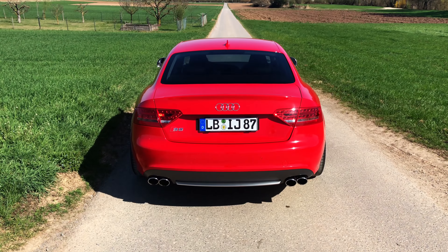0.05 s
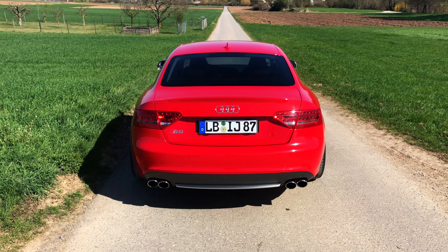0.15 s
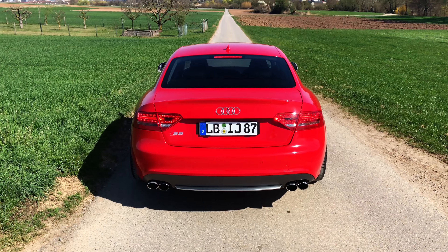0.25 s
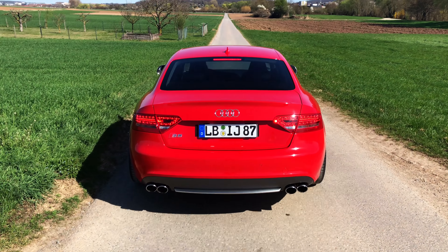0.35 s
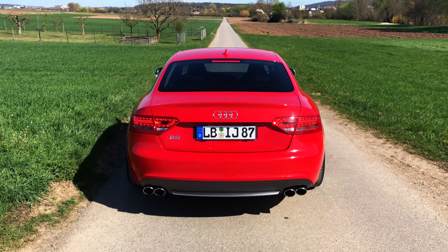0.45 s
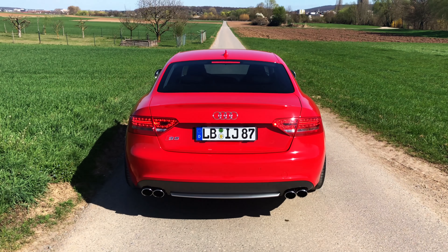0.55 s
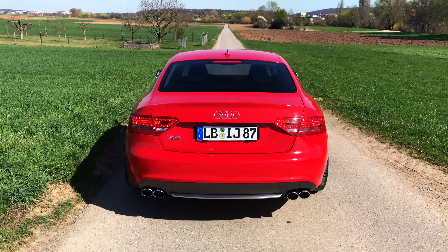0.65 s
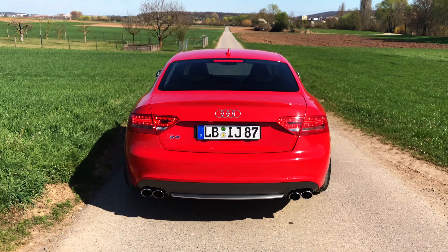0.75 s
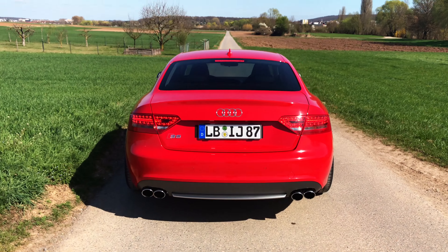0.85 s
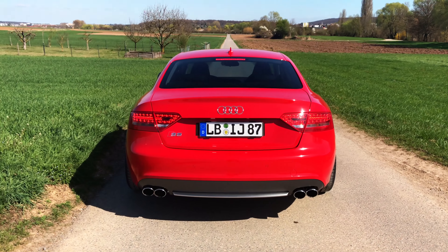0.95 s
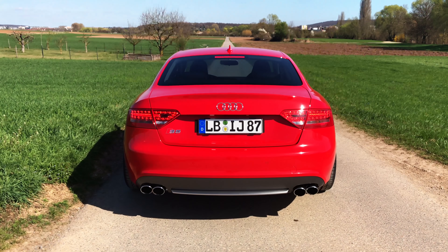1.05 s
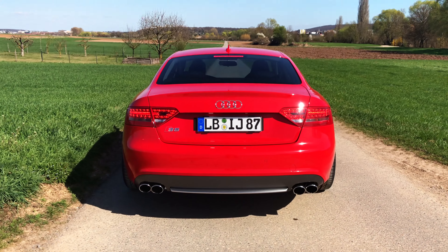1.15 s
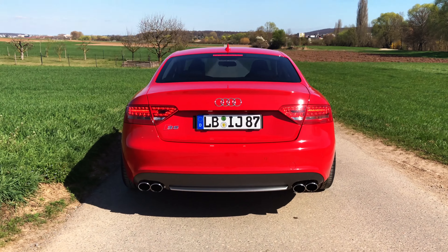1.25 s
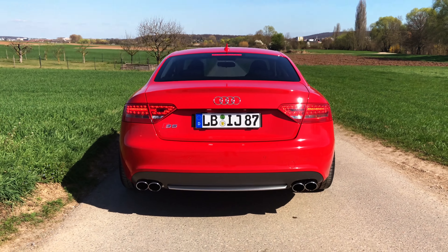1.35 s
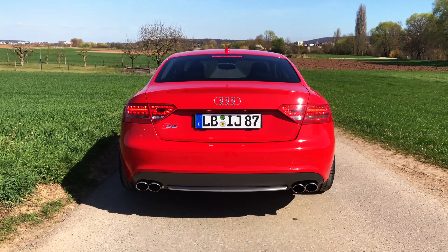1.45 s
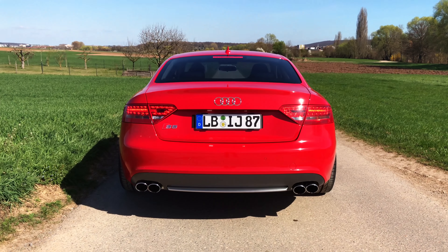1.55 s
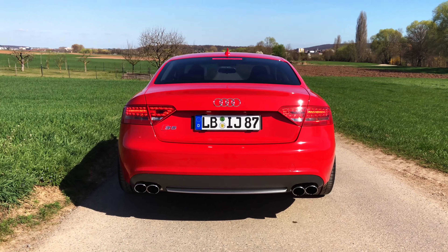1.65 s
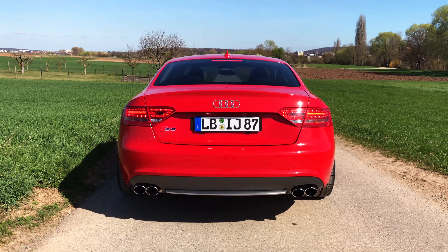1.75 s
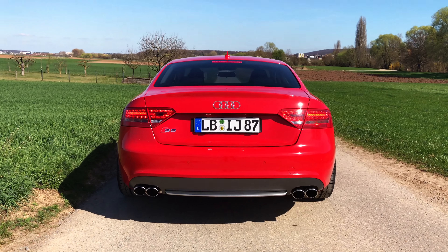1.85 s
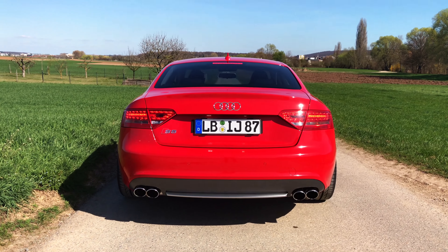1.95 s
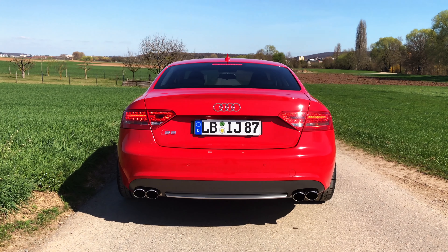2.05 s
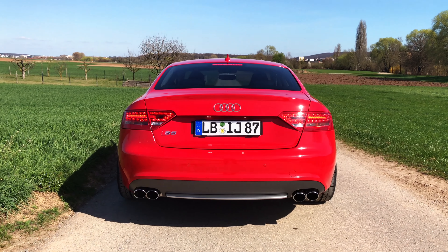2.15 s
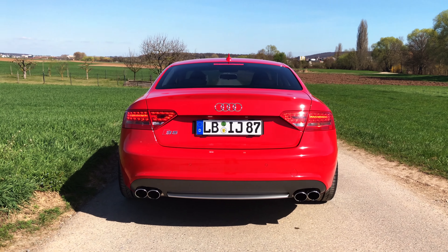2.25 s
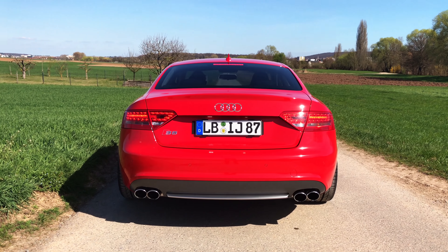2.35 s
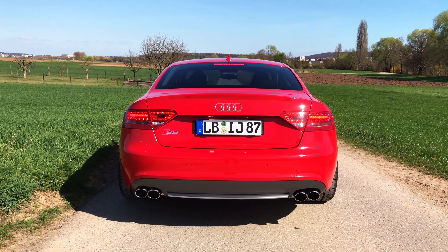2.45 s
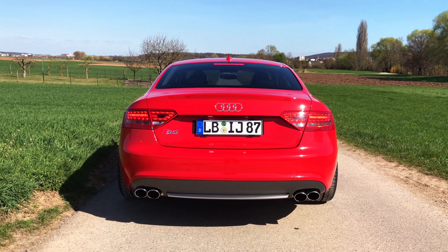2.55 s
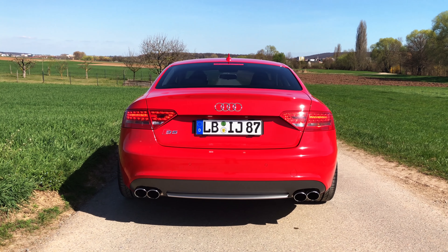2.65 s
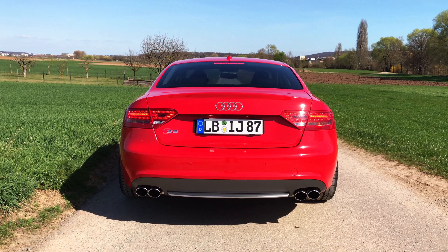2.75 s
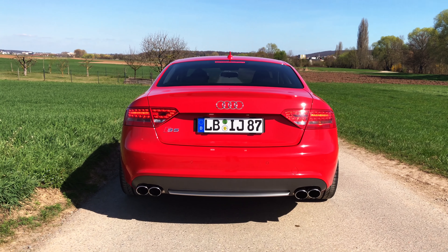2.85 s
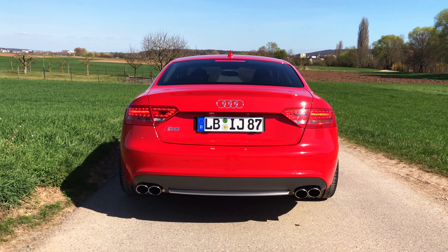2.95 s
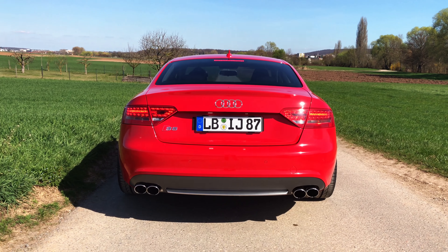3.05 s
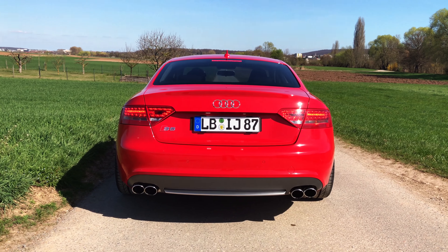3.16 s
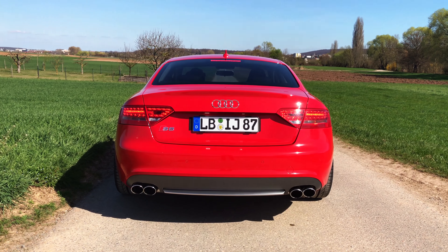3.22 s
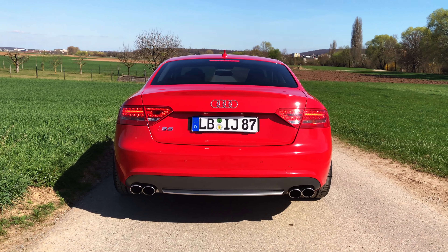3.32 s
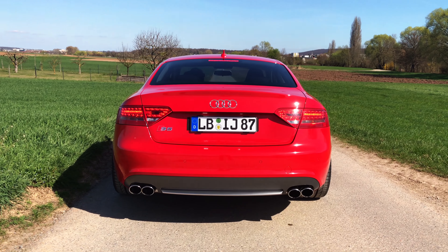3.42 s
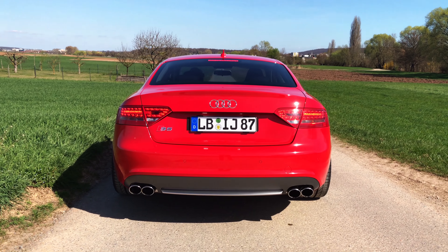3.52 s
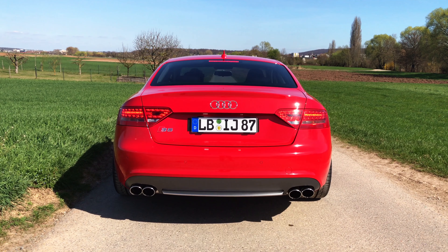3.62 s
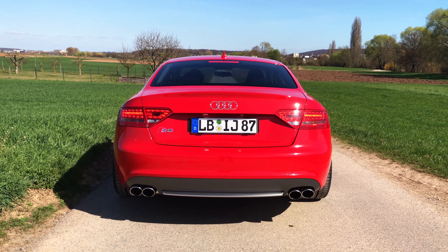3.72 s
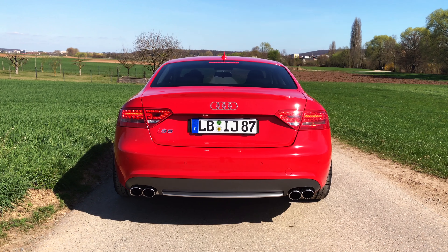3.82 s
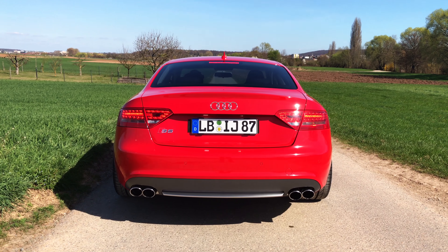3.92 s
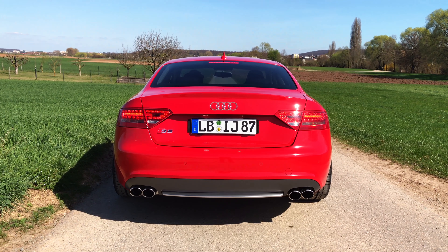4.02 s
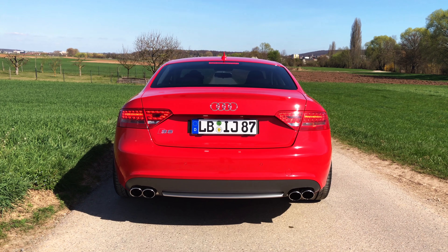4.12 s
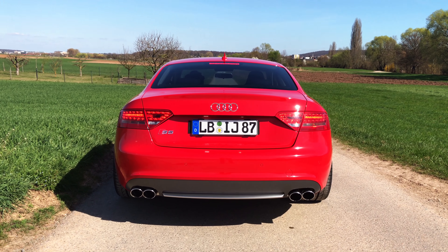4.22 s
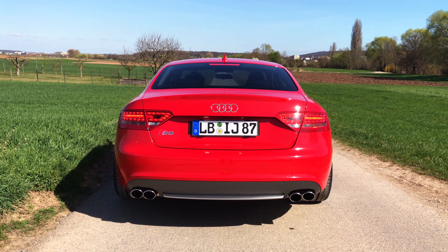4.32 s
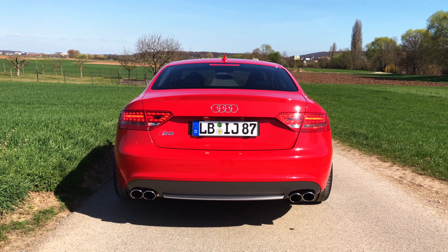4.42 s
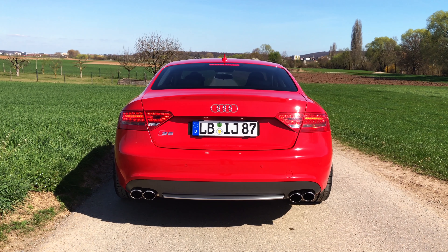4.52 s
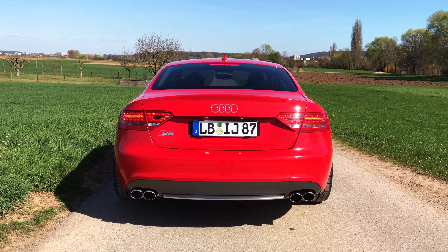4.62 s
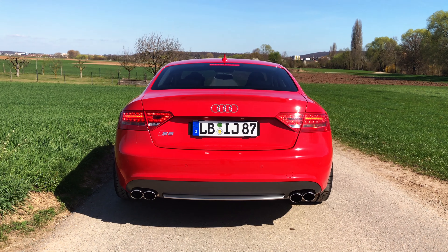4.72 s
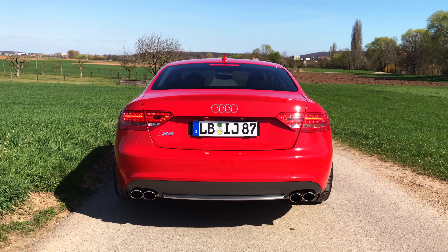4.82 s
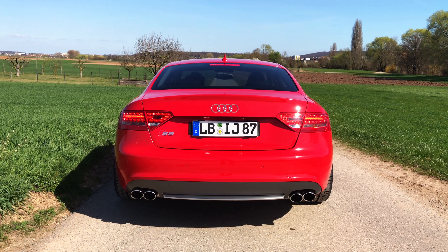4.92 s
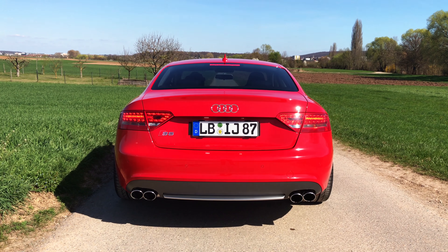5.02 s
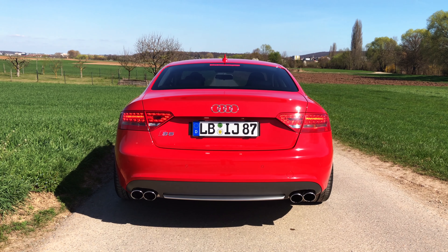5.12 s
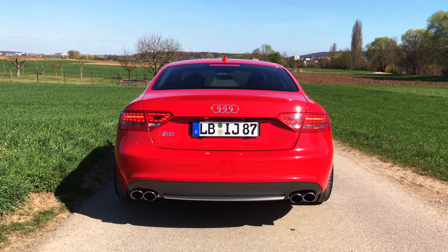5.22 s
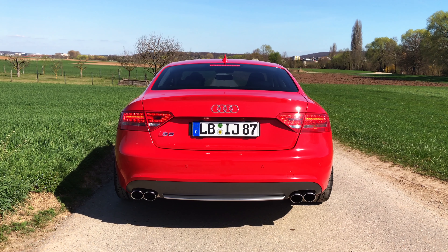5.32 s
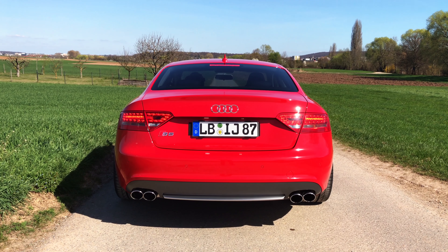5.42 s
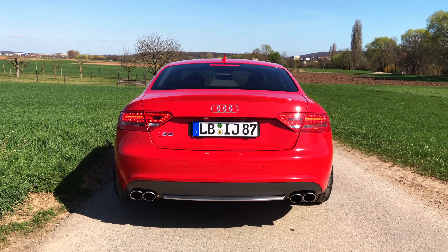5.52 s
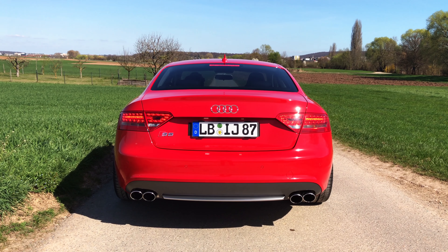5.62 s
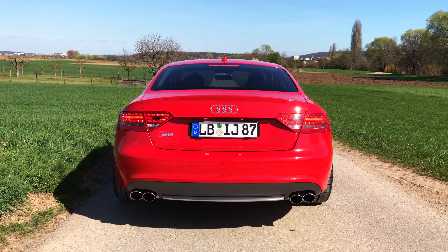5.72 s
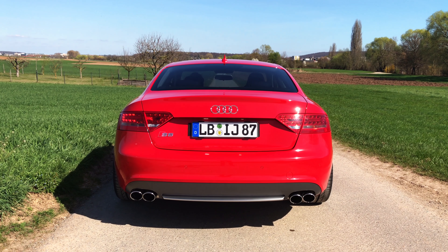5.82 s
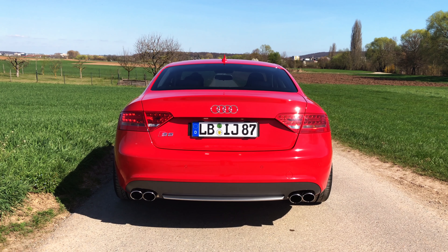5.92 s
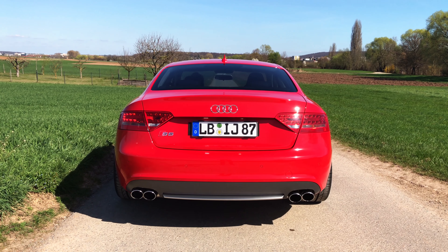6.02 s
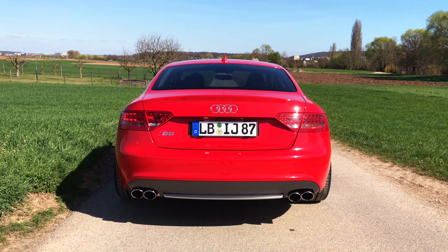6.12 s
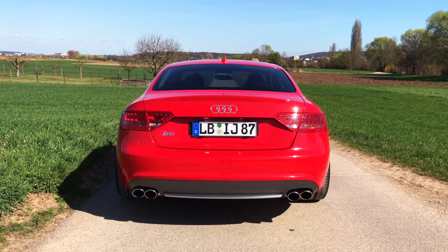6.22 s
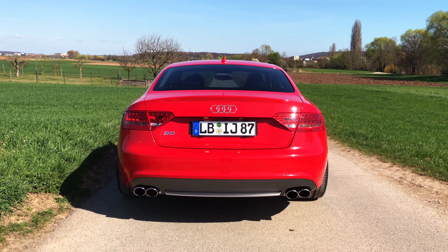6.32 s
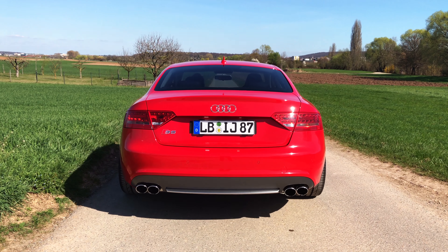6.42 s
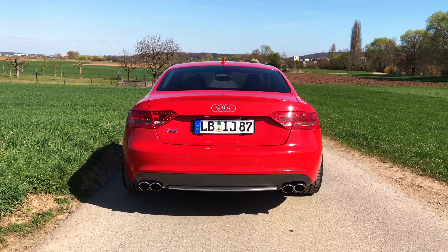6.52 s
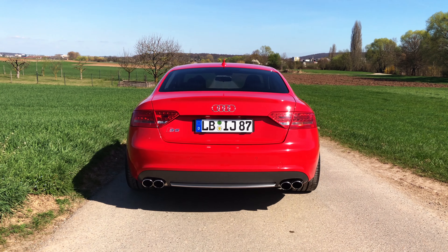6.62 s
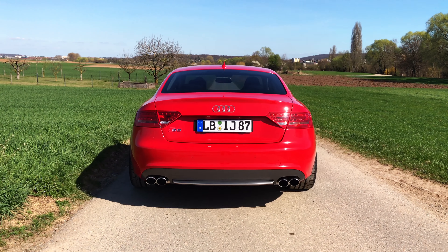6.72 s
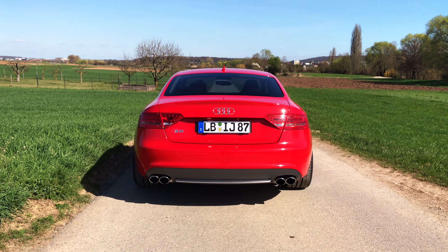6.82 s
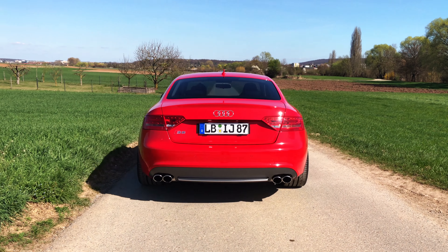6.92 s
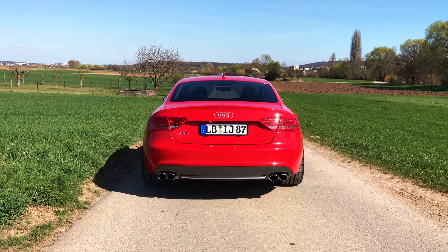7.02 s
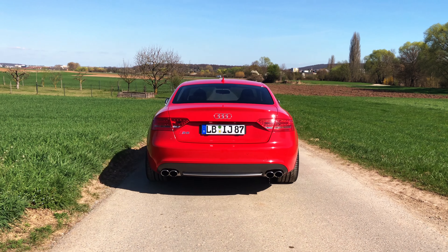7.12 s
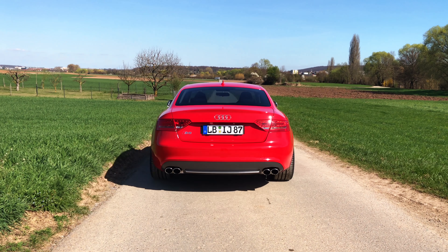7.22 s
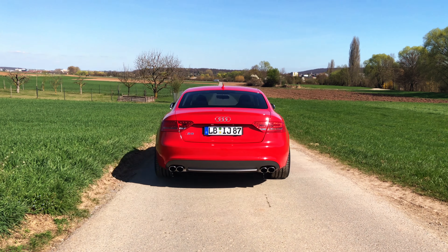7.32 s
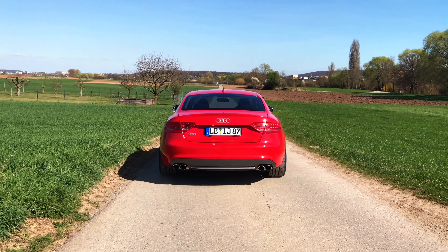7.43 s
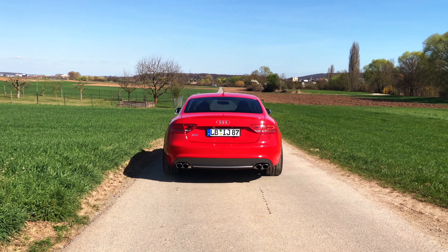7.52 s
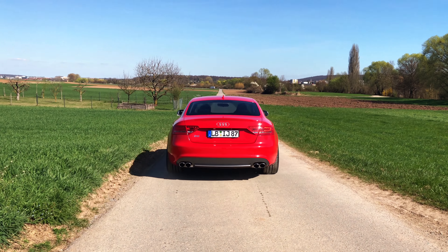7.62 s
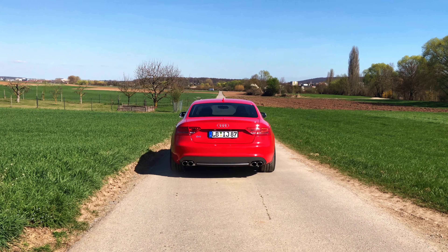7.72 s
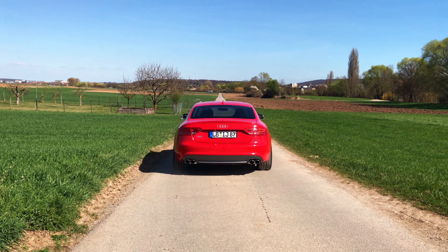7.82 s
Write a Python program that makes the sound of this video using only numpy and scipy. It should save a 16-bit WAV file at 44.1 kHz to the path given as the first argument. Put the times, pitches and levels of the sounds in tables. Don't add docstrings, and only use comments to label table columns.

```python
import sys
import numpy as np
from scipy import signal
from scipy.fft import rfft, irfft
from scipy.io import wavfile
from scipy.ndimage import uniform_filter1d

SR = 44100
rng = np.random.default_rng(int(sys.argv[2]) if len(sys.argv) > 2 else 0)


def how_loud(loudness_db):
    steps = np.asarray(loudness_db, float) / 20
    return 10 ** steps


def log_audio(samples):
    frames = np.atleast_2d(samples).T
    limited = np.clip(frames, -1, 1)
    pcm = np.round(limited * 32767).astype(np.int16)
    wavfile.write(sys.argv[1], SR, pcm)


N = 347067
TIME = np.arange(N) / SR
CATCH_S = 1.298
STUMBLE_S = 6.245

# t/s, firing rate/Hz, firing tone/dB
ENGINE_RUN = [(1.22, 52.06, -34), (1.29, 55.9, -5.5), (1.335, 56.3, -4), (1.46, 90.14, -12),
              (1.6, 108.4, -15.5), (1.9, 106.7, -19), (2.75, 83.5, -18.5), (3.5, 74.3, -18),
              (6.27, 58.4, -19), (6.47, 63.23, -7), (6.7, 85.9, -11), (6.9, 80.2, -14), (7.09, 62.9, -11.5),
              (7.2, 75.4, -6.5), (7.3, 85.3, -12), (7.42, 86.4, -12), (7.62, 106, -20),
              (7.87, 125.3, -17.5)]
# f/Hz, level/dB
SILENCER_RESPONSE = [(15, -46.5), (35, -20.5), (45, -23.5), (55, -2.5), (66, -1.5), (82, -6), (109, -14.5),
                     (135, -14.5), (172, -11.5), (215, -23.5), (260, -33), (310, -32), (400, -48.5),
                     (2000, -89.5)]
# f/Hz, level/dB per Hz
BAY_SPECTRUM = [(1350, -34.5), (2300, -3.5), (3020, -3.5), (3450, 1), (3750, -1), (4540, -6.5),
                (4950, -9.5), (6060, -5.5), (7070, -12.5), (7690, -25.5), (8200, -34), (10700, -54),
                (18000, -120)]
# t/s, peak level/dB, length/s, brightness/dB, thump/dB
STROKES = [(0.487, -18, 0.032, -7.5, -9), (0.587, -32.5, 0.068, -37.5, 2), (0.65, -43, 0.053, -25, -3),
           (0.701, -27.5, 0.065, -27, 0), (0.807, -36.5, 0.052, -21, -4), (0.833, -31.5, 0.059, -16.5, -12),
           (0.92, -23, 0.041, -32, -2.5), (1.002, -28, 0.05, -15.5, -8), (1.086, -23, 0.029, -43, -6),
           (1.163, -24, 0.026, -16, -5), (1.204, -28, 0.02, -16, -1), (1.246, -28, 0.026, -15, 0),
           (1.31, -25.5, 0.069, -8.5, 13)]


def curves(table):
    s, *columns = np.transpose(table)
    return [np.interp(TIME, s, c) for c in columns]


def shape_db(hz, points):
    f, db = np.transpose(points)
    return np.interp(np.log(np.maximum(hz, 1)), np.log(f), db)


def colour(x, points, size=1 << 14):
    cep = irfft(shape_db(np.fft.rfftfreq(size, 1 / SR), points) * np.log(10) / 20)
    cep[1:size // 2] *= 2
    cep[size // 2 + 1:] = 0
    return signal.fftconvolve(x, irfft(np.exp(rfft(cep))))[:N]


def band(x, hz, width):
    return signal.lfilter(*signal.iirpeak(min(hz, .45 * SR), hz / width, fs=SR), x)


def unit(x):
    return x / np.sqrt(np.mean(x ** 2))


def walk(rate):
    k = int(SR / rate)
    held = np.repeat(rng.standard_normal(N // k + 1), k)
    return unit(uniform_filter1d(uniform_filter1d(held, k), k)[:N])


def hiss(points, flicker_db, rate, grit_db):
    grains = how_loud(grit_db * rng.exponential(size=N)) * rng.standard_normal(N)
    closed = [(points[0][0] / 1.3, -60)] + list(points) + [(points[-1][0] * 1.3, -60)]
    return unit(how_loud(flicker_db * walk(rate)) * colour(grains, closed))


def tone(table, waver_db=0.0):
    hz, db = curves(table)
    fade = np.clip(np.minimum(TIME - table[0][0], table[-1][0] - TIME) / 0.0076, 0, 1)
    return np.sqrt(2) * fade * how_loud(db + waver_db * walk(45)) * np.sin(2 * np.pi * np.cumsum(hz) / SR)


def bumps(rows):
    return sum(how_loud(db) * np.exp(-((TIME - s) / length) ** 2) for s, db, length in rows)


def engine_state():
    idle_hz, idle_effort_db, flywheel_s = 60, -19, .04
    hz, tone_db = (uniform_filter1d(c, int(flywheel_s * SR)) for c in curves(ENGINE_RUN))
    tone_db = tone_db - 13 * bumps([(STUMBLE_S, 0, .03)])
    effort_db = np.maximum(tone_db - shape_db(hz, SILENCER_RESPONSE) - idle_effort_db, -6)
    tone_db += -2.5 * np.clip(effort_db / 6, 0, 1) * np.exp(-((hz - 79) / 3) ** 2)
    in_gear = np.clip((TIME - STUMBLE_S) / .1, 0, 1)
    return hz, tone_db, np.log2(hz / idle_hz), effort_db, in_gear


def tyres():
    from_s, full_s = 6.75, 7.87
    return np.clip((TIME - from_s) / (full_s - from_s), 0, 1) ** 1.8


def machinery(rest_db, idle_db, per_octave_db, crank_db):
    _, _, octaves, _, _ = engine_state()
    cranking = np.interp(TIME, [STROKES[0][0], STROKES[1][0], CATCH_S], [rest_db, *crank_db])
    chug_db, chug_s = 6, .018
    chugs = bumps([(row[0] + chug_s / 2, 0, chug_s) for row in STROKES[1:]])
    cranking += chug_db * (chugs - .5 * (TIME > STROKES[1][0]))
    caught = np.clip((TIME - CATCH_S) / 0.11, 0, 1)
    return how_loud(cranking + caught * (idle_db + per_octave_db * octaves - cranking))


def road_roar():
    # f/Hz, level/dB per Hz
    roar_spectrum = [(210, -16), (350, -7), (526, -3), (554, -2.5), (804, -0.5), (1150, 1.5), (1770, -6.5),
                     (2040, -10.5), (2900, -23.5), (3770, -40), (6380, -120)]
    _, _, octaves, _, _ = engine_state()
    roar_db = np.interp(TIME, [0, .3, CATCH_S, 2.5], [-49.5, -46.4, -47.5, -49])
    roar_db += 1.5 * octaves * (TIME > CATCH_S)
    level = np.hypot(how_loud(roar_db), how_loud(-40) * tyres())
    return level * hiss(roar_spectrum, flicker_db=1.0, rate=8.7, grit_db=1.5)


def wind():
    # f/Hz, level/dB per Hz
    wind_spectrum = [(8.8, -50.5), (15, -22), (43, -1), (70, 8), (92, -0.5), (188, -20.5), (353, -40),
                     (400, -33.5), (520, -50), (880, -120)]
    # t/s, level/dB
    gust_events = [(.1, -47), (.495, -45.5), (.57, -41.5), (.832, -34), (1.02, -34.5), (1.085, -46),
                   (1.17, -42)]
    breeze_db, gust_s = -43.5, 0.019
    level = bumps([(s, db, gust_s) for s, db in gust_events]) + how_loud(breeze_db)
    return level * hiss(wind_spectrum, flicker_db=2.0, rate=11, grit_db=1.5)


def birds():
    # t/s, f/Hz, level/dB
    bird_notes = [
        [(0.02, 6469, -82), (0.044, 6333, -75), (0.07, 6238, -86)],
        [(0.09, 5292, -81), (0.1, 5272, -72), (0.136, 5092, -67), (0.16, 5084, -81)],
        [(0.26, 4034, -82), (0.272, 4096, -71), (0.306, 4135, -69), (0.34, 4178, -73)],
    ]
    trill_hz, trill_depth = 255, .9
    trill = 1 + trill_depth * np.cos(2 * np.pi * trill_hz * TIME)
    return tone(bird_notes[0]) + tone(bird_notes[1]) + trill * tone(bird_notes[2])


def whistles():
    # t/s, f/Hz, level/dB
    pump_whistle = [(.7, 9750, -80), (2.3, 9550, -82), (3.7, 9100, -76), (5.5, 8520, -77), (6.1, 8370, -80)]
    # t/s, f/Hz, level/dB
    short_hums = [
        [(1.55, 1536, -58), (1.7, 1567, -54.5), (2.05, 1555, -62)],
        [(2.1, 15500, -86), (2.75, 15760, -79), (3.2, 15800, -94)],
        [(4.3, 2930, -72), (4.6, 2900, -65.5), (4.95, 2850, -69)],
        [(2.6, 6176, -71), (3.3, 6290, -74), (3.9, 6180, -74)],
    ]
    return tone(pump_whistle, waver_db=2.5) + sum(tone(hum, waver_db=1.0) for hum in short_hums)


def belt_whines():
    whine_orders = [
        (43.6, 1.5, 2.18, -57),
        (42.5, 2.18, 2.6, -65),
        (42.3, 2.62, 3.1, -59),
        (36, 1.65, 2.6, -67),
        (57.5, 1.5, 2.2, -67),
    ]
    hz, *_ = engine_state()
    out = np.zeros(N)
    for order, start, end, db in whine_orders:
        f = order * hz * (1 + .003 * walk(40))
        fade = np.clip(np.minimum(TIME - start, end - TIME) / .05, 0, 1)
        level = how_loud(db + .5 * shape_db(f, BAY_SPECTRUM) + 3.5 * walk(35))
        out += fade * level * np.sin(2 * np.pi * np.cumsum(f) / SR)
    return out


def bay_clatter():
    # f/Hz, width/Hz, level/dB
    panel_modes = [(1740, 70, -9), (3300, 80, -11), (3500, 70, -10), (3940, 50, -15), (4200, 40, -16),
                   (4720, 50, -18), (5560, 40, -21), (6270, 50, -18), (6710, 70, -18)]
    # t/s, level/dB, length/s
    clutch_events = [
        (6.22, -57, 0.13),
        (6.5, -57.5, 0.14),
        (7.2, -59.5, 0.34),
    ]
    hz, *_ = engine_state()
    valves = 1 + 0.04 * np.cos(np.pi * np.cumsum(hz) / SR)
    noise = rng.standard_normal(N)
    ringing = sum(how_loud(db + 4.1 * walk(4)) * unit(band(noise, f, width)) for f, width, db in panel_modes)
    level = np.hypot(machinery(-73, -59.5, 7.2, (-62.5, -47)), bumps(clutch_events))
    return level * valves * (hiss(BAY_SPECTRUM, flicker_db=0.7, rate=15, grit_db=2.0) + ringing)


def top_hiss():
    # f/Hz, level/dB per Hz
    top_spectrum = [(4410, -26.5), (7500, -3), (7970, -6.5), (9290, -2.5), (10700, -9), (12100, -5),
                    (15600, -10)]
    level = np.hypot(machinery(-75.5, -70.5, 7.8, (-75, -65.5)), how_loud(-65.5) * tyres())
    return level * hiss(top_spectrum, flicker_db=.4, rate=20, grit_db=1.5)


def ticks():
    # t/s, peak level/dB, body/dB, spit/dB, t60/s
    tick_events = [(2.4593, -46, 6.5, -15.5, 0.022), (2.668, -44.5, -4, -12.5, 0.03),
                   (3.619, -50, 11, -21.5, 0.036), (3.6746, -42, 1.5, -25, 0.038),
                   (6.1463, -44.5, 7, -26, 0.035), (6.1912, -40.5, 1.5, -24, 0.06),
                   (6.2641, -46, 5, -25, 0.021), (6.308, -49, 5, -14, 0.04),
                   (6.6758, -39.5, 5, -37.5, 0.018), (6.93, -48.5, -11, -22.5, 0.041),
                   (7.0566, -37, -2.5, -11, 0.061), (7.233, -50, 1, -21, 0.027),
                   (7.2716, -47, -2, -26, 0.027), (7.6512, -46, -3.5, -12.5, 0.026),
                   (7.7193, -45.5, 1, -24.5, 0.031), (7.7804, -32, 3, -4, 0.052),
                   (7.8024, -45, 3, -21.5, 0.03), (7.8389, -31.5, 9.5, -40.5, 0.0047)]
    size = 8192
    out = np.zeros(N + size)
    t = np.arange(size) / SR
    for s, db, body_db, spit_db, t60 in tick_events:
        burst = rng.standard_normal(size) * np.exp(-np.log(1000) * t / max(t60, .004))
        crack = np.zeros(size)
        for hz, width, rel_db in ((1400, 1400, body_db + 3.5), (3700, 3300, 2.5), (10500, 23000, spit_db + 25)):
            part = band(band(burst, hz, width), hz, width)
            crack += how_loud(db + rel_db) * part / np.abs(part).max()
        start = int(s * SR)
        out[start:start + size] += crack
    return out[:N]


def starter_gears():
    # f/Hz, width/Hz, level/dB
    gear_bands = [(1600, 30, -2), (3280, 40, -3), (4230, 25, -9), (6500, 80, -11)]
    # t/s, level/dB
    mesh_level = [
        (.5, -56),
        (.8, -79),
        (1.1, -69.5),
        (1.22, -52.5),
        (1.33, -45.5),
        (1.4, -78.5),
    ]
    noise = rng.standard_normal(N)
    song = sum(how_loud(db + 4.0 * walk(30)) * unit(band(noise, hz, width)) for hz, width, db in gear_bands)
    meshed = (TIME > mesh_level[0][0]) * (TIME < mesh_level[-1][0])
    motor_off_s = 0.92
    turning = np.clip(np.minimum(TIME - mesh_level[0][0], motor_off_s - TIME) / 0.031, 0, 1)
    drone = turning * how_loud(-54 + 5.2 * walk(25)) * unit(band(noise, 950, 62))
    return meshed * how_loud(curves(mesh_level)[0]) * song + drone


def starter_strokes():
    # f/Hz, width/Hz, level/dB
    housing_modes = [(903, 43, -1.5), (1185, 17, 0), (1616, 10.6, -0.5), (1900, 72, -14), (2690, 53, -9.5),
                     (3160, 130, -20.5), (3726, 24, -6), (4560, 59, -27.5), (6200, 40, -9.5)]
    split_hz = 2350
    noise = rng.standard_normal(N)
    dull, bright = np.zeros(N), np.zeros(N)
    for hz, width, db in housing_modes:
        rattle = how_loud(db) * unit(band(noise, hz, width)) * np.sqrt(width)
        if hz < split_hz:
            dull += rattle
        else:
            bright += rattle
    dull = unit(unit(dull) + 0.48 * unit(band(band(noise, 760, 850), 950, 1200)))
    bright = unit(unit(bright) + unit(band(noise, 4000, 6000)))
    thump = unit(band(band(noise, 90, 91), 75, 100))
    out = np.zeros(N)
    for s, db, length, bright_db, thump_db in STROKES:
        u = np.clip((TIME - s) / max(length, .005), 0, 30)
        rattle_env = np.minimum(u * 4, 1) * np.exp(-u ** 2)
        thump_env = np.minimum(u, 1) * np.exp(-(u / 1.4) ** 2)
        out += how_loud(db - 14) * rattle_env * (dull + how_loud(bright_db) * bright)
        out += how_loud(db + thump_db - 14) * thump_env * thump
    return out


def tailpipe_puffs():
    # t/s, level/dB, length/s
    cough_events = [
        (1.31, -26, 0.051),
        (1.93, -26, 0.048),
        (6.22, -33, 0.065),
        (7.26, -34, .05),
    ]
    level = (TIME > CATCH_S) * how_loud(-44.5 + 5.5 * walk(2.7)) + bumps(cough_events)
    return level * unit(band(band(rng.standard_normal(N), 40, 27), 42, 34))


def exhaust():
    order_families = [
        [16, 24],
        [11, 13, 21],
        [4, 6, 10, 12, 14, 17, 18, 22],
        [5],
    ]
    order_levels = [
        [1.5, -9],
        [-10, 6, 0],
        [-20, 3.9, 5.3, -18, 1.5, 0.5, -1.5, -4],
        [1],
    ]
    hz, tone_db, octaves, effort_db, in_gear = engine_state()
    phase = np.cumsum(hz) / SR
    cycle, weak_one, weak_share = 8, 5, 0.13
    scatter, drift_db = .2, 1.2

    def law(idle, per_octave, per_effort_db, once_in_gear):
        return idle + per_octave * octaves + per_effort_db * effort_db + once_in_gear * in_gear

    overtone_db = law(-10, -6, 0.1368, 2) - .3 * np.maximum(hz - 90, 0)
    bank_db, low_bank_db = law(-36.5, 19.5, 0.2131, -9), law(-32.5, 20, -0.2, 1)
    crank_db = law(-11, -4, -.55, -6)
    uneven = law(.85, -.25, -.028, .05) + .3 * np.clip((TIME - 7.5) * 10, 0, 1)
    rasp_db = law(-61, -2.5, 1.04, 1.6) + 7 * np.exp(-((hz - 107.9) / 7.6) ** 2)

    running = np.clip((TIME - ENGINE_RUN[0][0]) / 0.021, 0, 1)
    push = np.sqrt(2) * running * how_loud(tone_db - shape_db(hz, SILENCER_RESPONSE))
    lines = np.cos(2 * np.pi * phase)
    families = zip(order_families, order_levels, (overtone_db, bank_db, crank_db, low_bank_db))
    for orders, levels, strength_db in families:
        drift = how_loud(strength_db + drift_db * walk(6.2))
        for order, db in zip(orders, levels):
            slip = .7 * walk(7)
            lines += drift * how_loud(db) * np.cos(2 * np.pi * (order * phase / cycle + rng.random()) + slip)

    firing = np.arange(1, int(phase[-1]))
    at = np.interp(firing, phase, np.arange(N)).astype(int)
    excess = weak_share * (1 / cycle - (firing % cycle == weak_one))
    excess = excess + scatter * rng.standard_normal(len(firing))
    pulse_size = np.clip(uneven, 0, 2) * push * SR / hz / 2
    pulses = np.bincount(at, excess * pulse_size[at], N)

    bank_gate = 1 + .6 * np.cos(2 * np.pi * 3 * phase / cycle)
    gas = band(band(band(rng.standard_normal(N), 288, 80), 303, 190), 288, 170)
    rasp = running * how_loud(rasp_db) * unit(bank_gate * gas)
    return colour(push * lines + pulses, SILENCER_RESPONSE) + rasp


def scene():
    background = road_roar() + wind() + birds()
    car = whistles() + belt_whines() + bay_clatter() + top_hiss() + ticks()
    starting = starter_gears() + starter_strokes()
    return (background + car + starting + tailpipe_puffs() + exhaust())[None]


def roll_off(x):
    return signal.sosfilt(signal.butter(12, 15730, fs=SR, output="sos"), x)


def record(dry):
    rounded = np.tanh(0.19 * dry) * 5.24
    low_pass = signal.ellip(10, .3, 80, 15730, fs=SR, output="sos")
    end_fade = np.clip((TIME[-1] - TIME) / .008, 0, 1)
    return roll_off(signal.sosfilt(low_pass, rounded) * end_fade)


dry = scene()
out = record(dry)
log_audio(out)
```